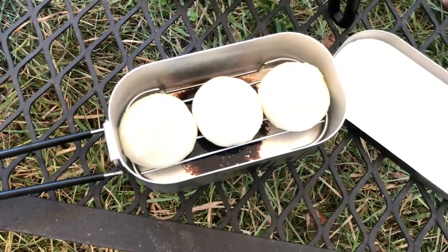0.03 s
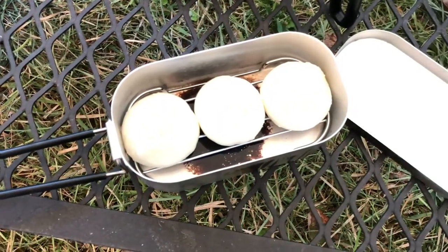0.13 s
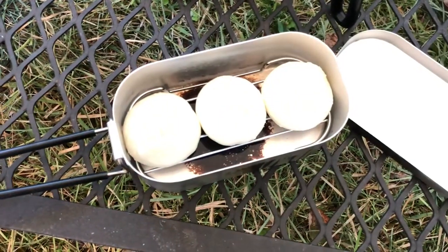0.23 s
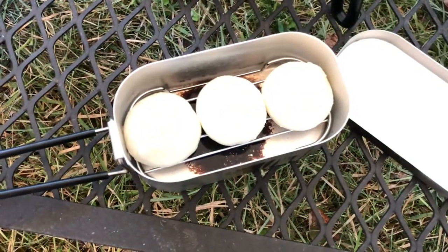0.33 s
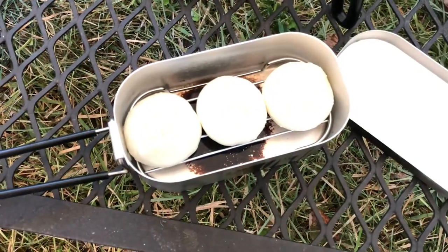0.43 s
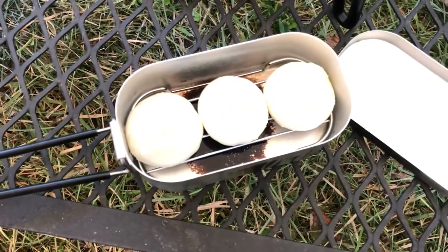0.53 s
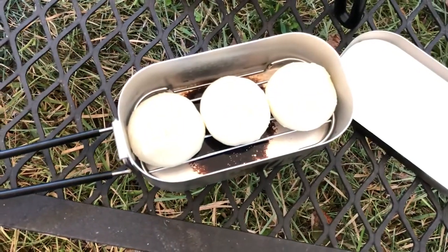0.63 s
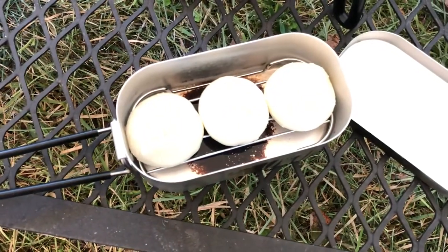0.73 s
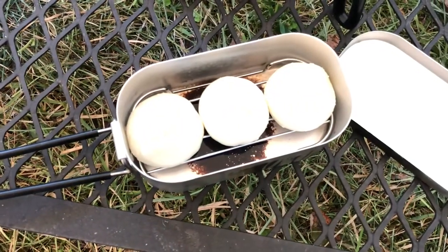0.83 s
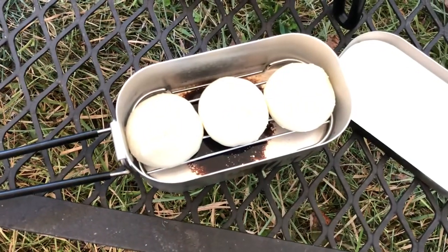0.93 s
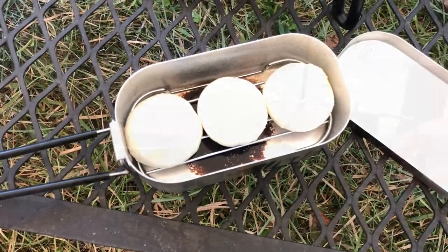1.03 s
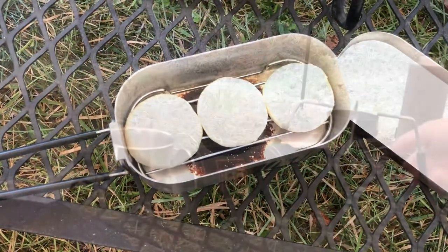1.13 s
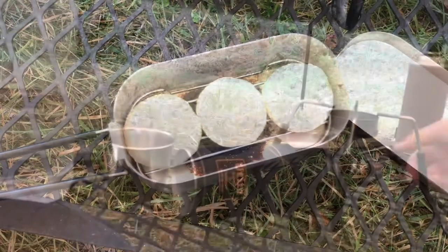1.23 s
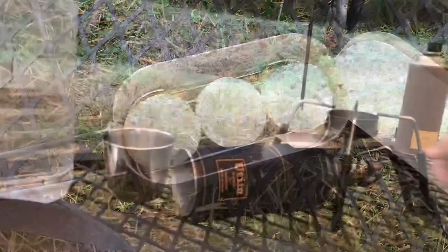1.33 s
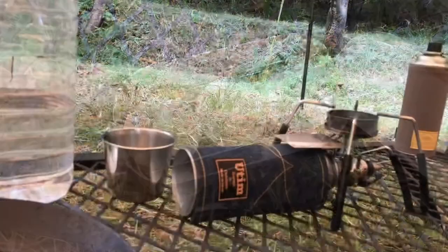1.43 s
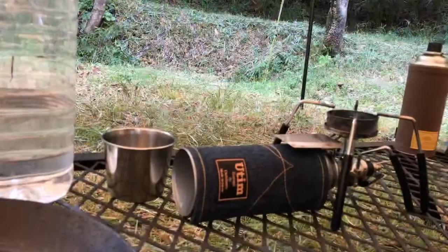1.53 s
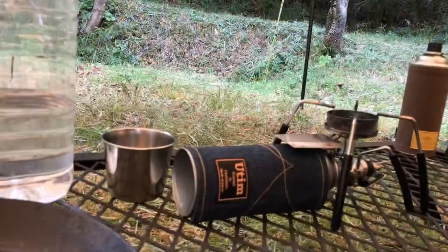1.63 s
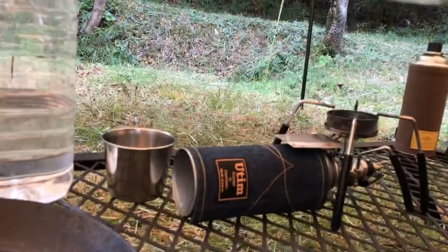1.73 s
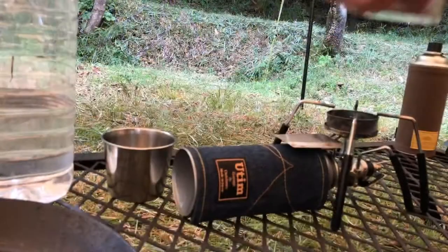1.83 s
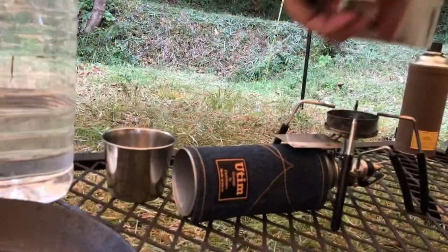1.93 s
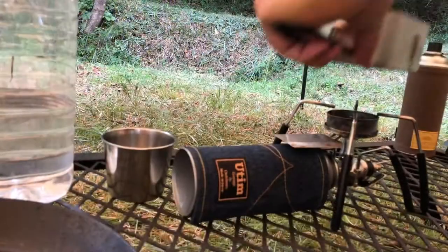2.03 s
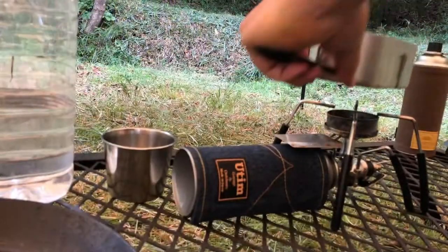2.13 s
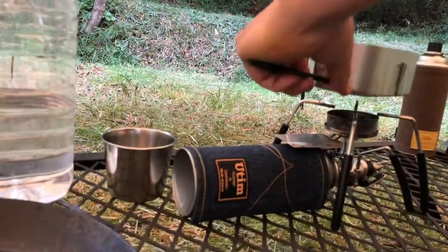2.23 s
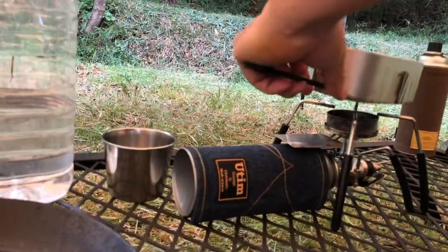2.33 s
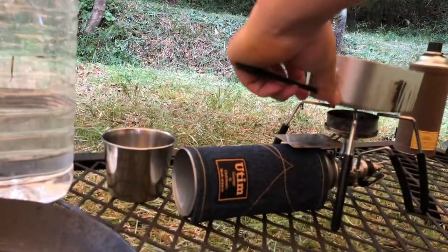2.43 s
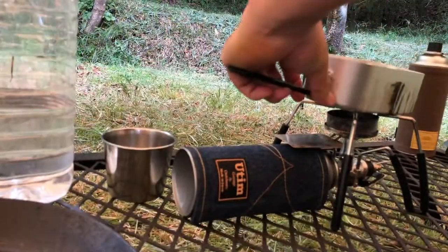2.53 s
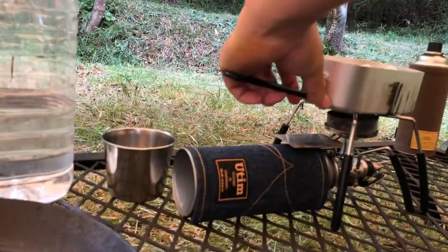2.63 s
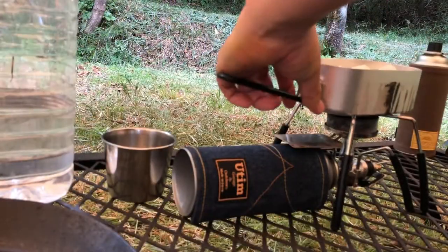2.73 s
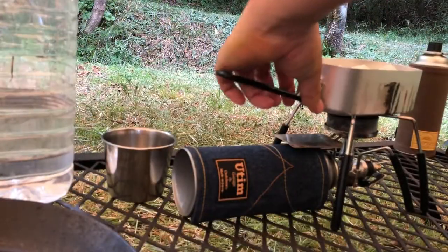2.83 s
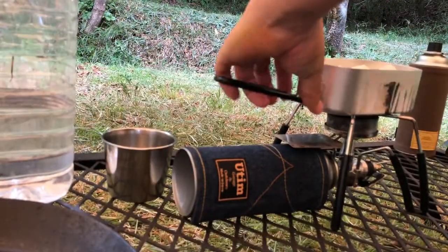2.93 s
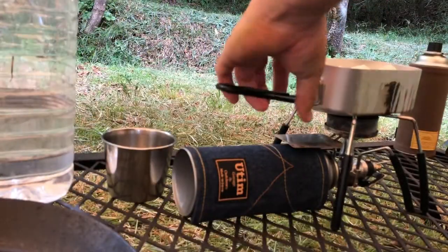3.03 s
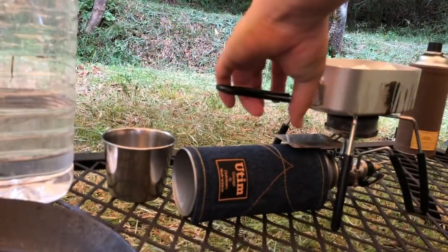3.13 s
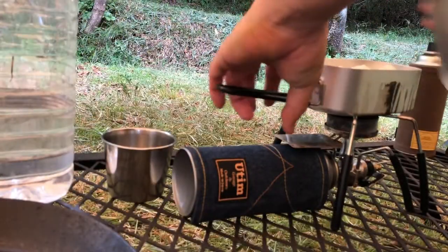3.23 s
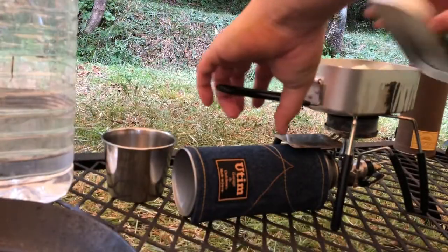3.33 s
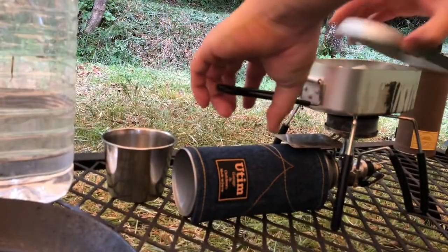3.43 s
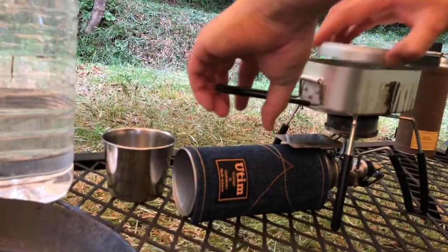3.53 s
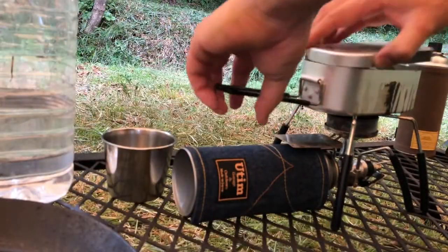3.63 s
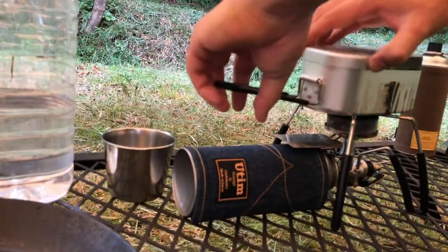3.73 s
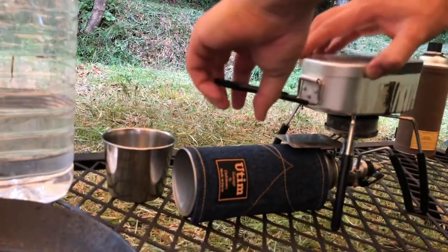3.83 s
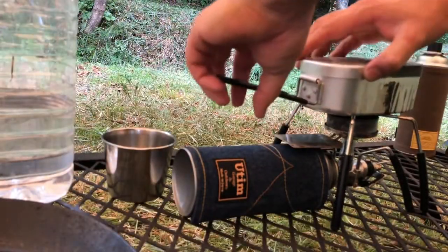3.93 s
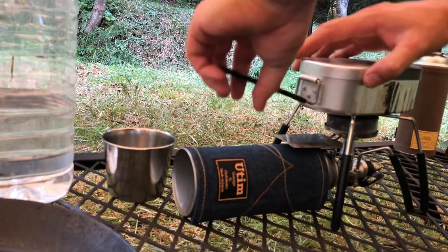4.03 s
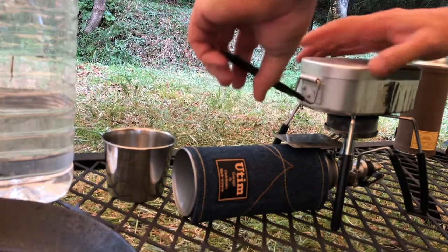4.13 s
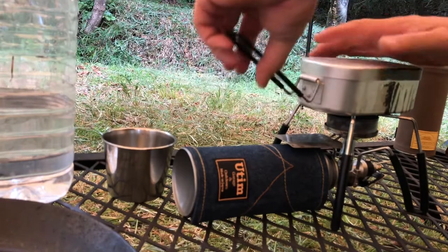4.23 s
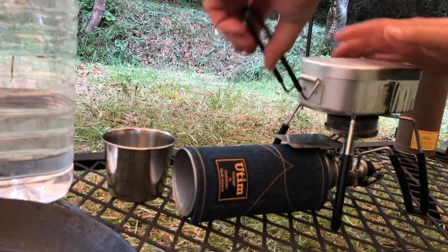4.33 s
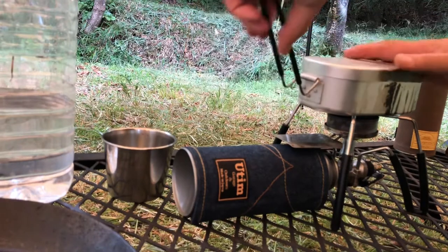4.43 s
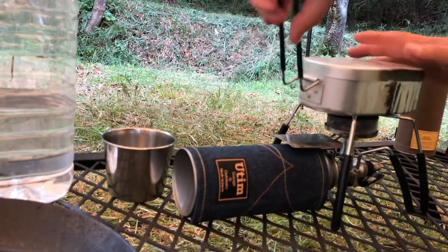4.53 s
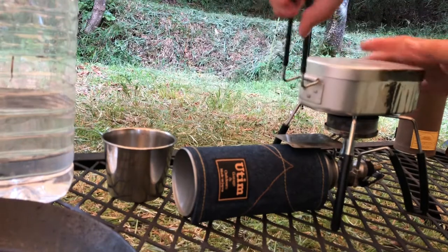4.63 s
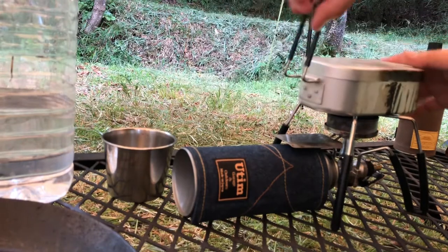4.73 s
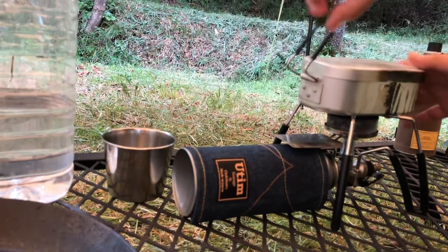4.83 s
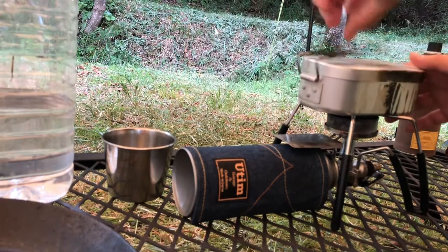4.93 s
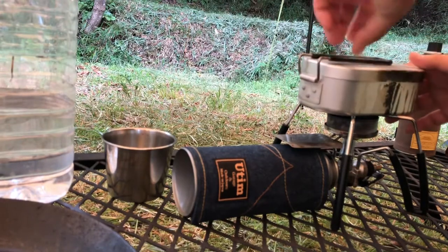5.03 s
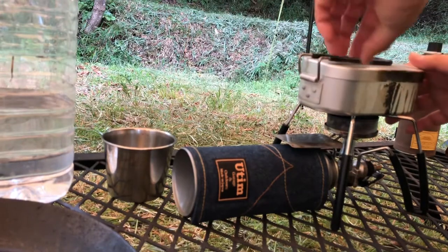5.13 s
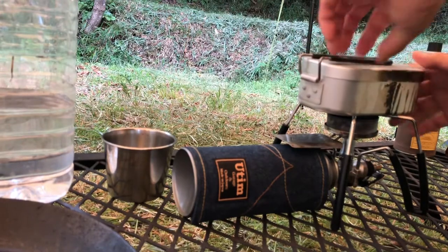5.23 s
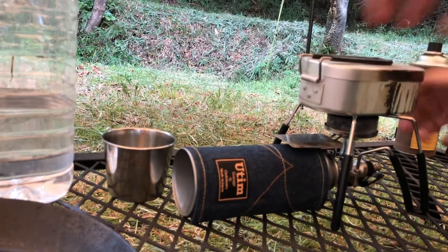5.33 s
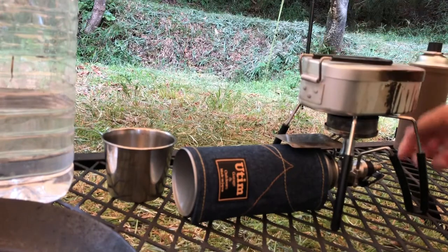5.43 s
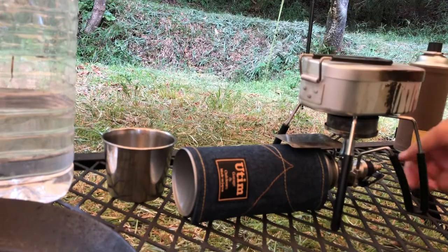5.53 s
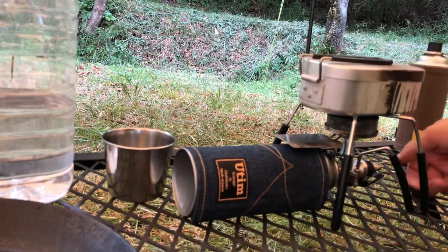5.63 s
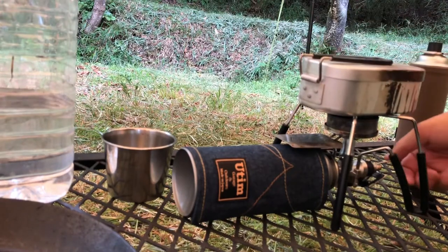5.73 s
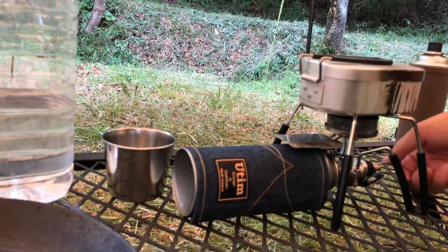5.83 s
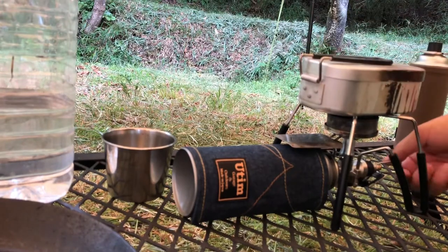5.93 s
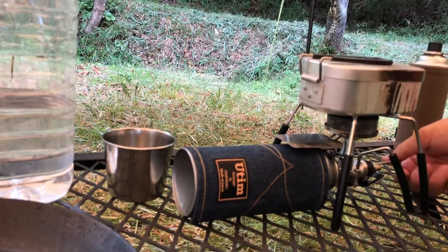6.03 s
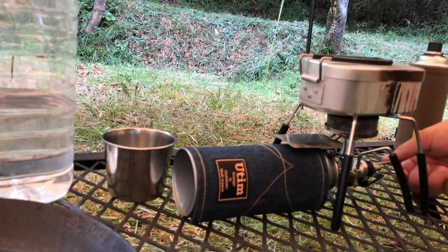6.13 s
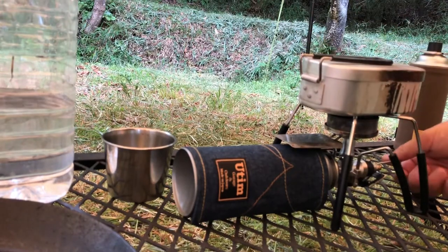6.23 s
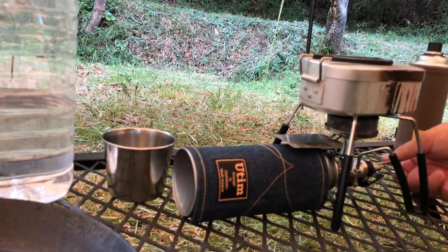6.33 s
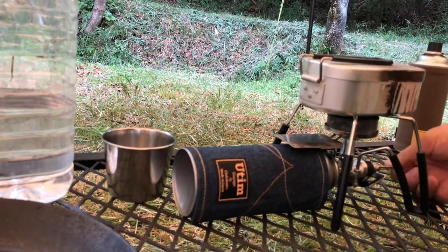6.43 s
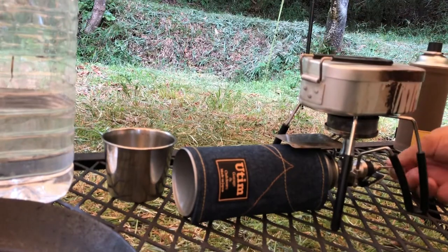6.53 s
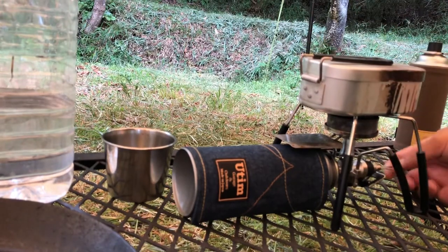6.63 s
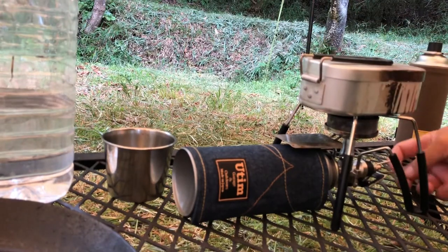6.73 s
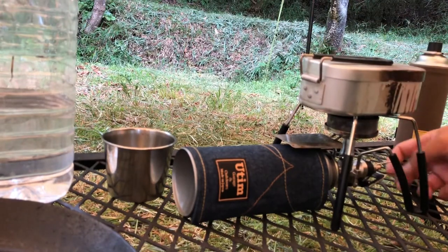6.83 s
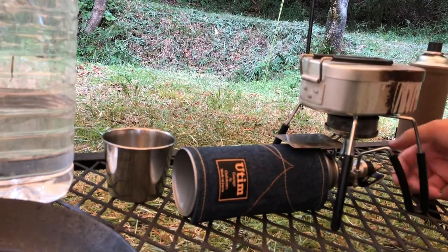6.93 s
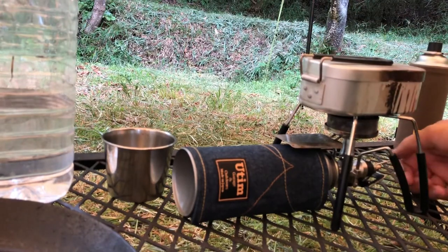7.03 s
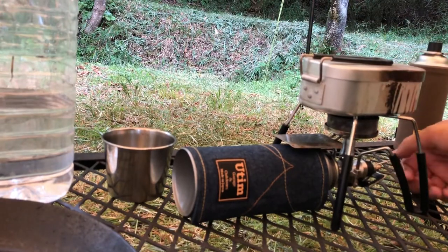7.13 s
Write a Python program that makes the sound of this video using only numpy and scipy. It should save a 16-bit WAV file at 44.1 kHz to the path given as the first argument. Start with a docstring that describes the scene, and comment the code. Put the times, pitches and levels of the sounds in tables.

```python
"""Setting up a camp stove

Outdoors, with insects singing far off, feet shift on dry grass: breaking blades, snapping stalks and soft thuds.
An aluminium mess tin is set on a camp stove and slid into place, its lid is pressed on and its wire handle
is folded over until it slaps the lid. Knocks ring groups of modes; friction is a stream of tiny slips.
A hand brushes the stove's leg with a puff and a hiss of shaped noise, then turns the gas valve, which clicks,
squeaks and rushes faintly at each twist. Knocks and rubbing also stir the steel mesh table below."""
import sys
import numpy as np
from scipy import signal
from scipy.fft import rfft, irfft
from scipy.io import wavfile

SR = 44100
rng = np.random.default_rng(int(sys.argv[2]) if len(sys.argv) > 2 else 0)


def store_wav(level_fs):
    """Save 16-bit WAV to argv[1]."""
    pcm = np.round(np.clip(np.atleast_2d(level_fs), -1, 1) * 32767)
    wavfile.write(sys.argv[1], SR, pcm.T.astype(np.int16))


N = 317520
TIME = np.arange(N) / SR
RING_TIME = TIME[:SR // 2]   # half a second for each ringing sound

# half-octave bands: (centre f/Hz, filter)
EDGES = 44 * 2 ** (np.arange(18) / 2)
BANDS = [(np.sqrt(lo * hi), signal.butter(2, [lo, hi], "band", fs=SR, output="sos"))
         for lo, hi in zip(EDGES, EDGES[1:])]

# the crowd of weak modes in the tin, also the colour of its rasp: f/Hz, level/dB per Hz
TIN_WASH = [(80, -32.5), (200, -8), (600, 5.5), (850, 2.5), (1400, 0.5), (2100, -1), (3300, -3), (7000, -7),
            (10000, -8.5), (16000, -8.5)]
# feet come down on dry grass: t/s, crunch level/dB, time to full weight/s, time on the ground/s
STEPS = [(.05, -36.5, 0.098, .46), (.51, -35.5, 0.079, 0.397)]


def from_db(db):
    """Turn decibels into gain."""
    return 10 ** (np.asarray(db) / 20)


def rms_one(x):
    """Scale to an average strength (rms) of 1."""
    return x / np.sqrt(np.mean(x ** 2) + 1e-20)


def attack_one(x):
    """Scale a blow so that its first hundredth of a second has rms 1."""
    return x / np.sqrt(np.mean(x[:SR // 100] ** 2) + 1e-20)


def level(rows):
    """Read a dB curve as gain over time."""
    return from_db(np.interp(TIME, *np.transpose(rows)))


def at_hz(points, hz):
    """Read a table between its points on a log-frequency axis."""
    points = np.array(points)
    return np.interp(np.log(hz + 1e-9), np.log(points[:, 0]), points[:, 1])


def coloured(x, spectrum):
    """Give a sound more or less of each frequency, as the spectrum says; rms 1."""
    gain = from_db(at_hz(spectrum, np.fft.rfftfreq(N, 1 / SR)))
    return rms_one(irfft(rfft(x) * gain, N))


def drift(rate_hz):
    """Wander slowly at random, with rms 1: noise smoothed by a two-pole filter."""
    step = 40   # only every 40th sample is drawn, the rest lie on straight lines between
    r = np.exp(-2 * np.pi * rate_hz * step / SR)
    noise = rng.standard_normal(N // step + 2002)
    slow = signal.lfilter([1], [1, -2 * r, r * r], noise)[2000:]
    return np.interp(np.arange(N) / step, np.arange(len(slow)), rms_one(slow))


def add(out, s, sound):
    """Mix a sound in at time s."""
    i = max(0, round(s * SR))
    out[i:i + len(sound)] += sound[:N - i]


def grains(per_s, spread_db):
    """Scatter tiny clicks of uneven size and random sign; rms 1."""
    sizes = from_db(spread_db * np.minimum(rng.exponential(1, N), 4))
    happens = rng.random(N) < per_s / SR
    return rms_one(sizes * rng.choice([-1, 1], N) * happens)


def ring(modes, uneven_db=1.5, detune=0):
    """Ring a set of fading sines, signs alternating, strengths a little different each time."""
    hz, db, t60 = np.array(modes).T[:, :, None]
    strength = from_db(db + uneven_db * rng.standard_normal(hz.shape))
    strength[1::2] *= -1
    hz = hz * (1 + detune * rng.standard_normal(hz.shape))
    fade = np.exp(-np.log(1000) * RING_TIME / t60)
    return attack_one(np.sum(strength * fade * np.sin(2 * np.pi * hz * RING_TIME), axis=0))


def wash(spectrum, decay):
    """Stand in for modes too dense to tell apart: noise that dies band by band."""
    white, out = rng.standard_normal((2, len(RING_TIME))), 0
    for k, (hz, band) in enumerate(BANDS):
        fade = np.exp(-np.log(1000) * RING_TIME / at_hz(decay, hz))
        strength = np.sqrt(hz * np.mean(fade ** 2))   # wider bands hold more
        noise = rms_one(signal.sosfilt(band, white[k % 2] * fade))
        out = out + from_db(at_hz(spectrum, hz)) * strength * noise
    return attack_one(out)


def crack(t60=0.027):
    """Make the bright instant of contact: a short burst of noise with its bass thinned."""
    burst = rng.standard_normal(len(RING_TIME)) * np.exp(-np.log(1000) * RING_TIME / t60)
    return attack_one(signal.sosfilt(signal.butter(1, 1500, "high", fs=SR, output="sos"), burst))


def metal(ringing, spectrum, wash_db, crack_db):
    """Build a struck metal part: contact crack, strong modes and the crowd between them."""
    # how fast the crowd dies: f/Hz, t60/s
    wash_t60 = [(150, 0.042), (1000, 0.037), (4000, 0.065), (16000, 0.066)]
    return from_db(crack_db) * crack() + ringing + from_db(wash_db) * wash(spectrum, wash_t60)


def blows(rows, body, bass_hz=450, treble_hz=5000):
    """Strike a body: a heavy contact adds bass, a hard one treble."""
    out = np.zeros(N)
    low, high = signal.butter(1, bass_hz, fs=SR), signal.butter(1, treble_hz, "high", fs=SR)
    for s, db, bass_db, treble_db in rows:
        sound = body()
        sound = sound + (from_db(bass_db) - 1) * signal.lfilter(*low, sound)
        sound = sound + (from_db(treble_db) - 1) * signal.lfilter(*high, sound)
        add(out, s, from_db(db) * attack_one(sound))
    return out


def rubbed(response, per_s, spread_db):
    """Rub a part: a stream of tiny slips keeps it ringing; rms 1."""
    return rms_one(signal.fftconvolve(grains(per_s, spread_db), response)[:N])


def strokes(rows):
    """Shape the gain of hand strokes: each swells to a rounded peak and fades again."""
    depth_db = 15   # swell within the rise time, and fade within the fall time
    db = []
    for s, peak_db, rise, fall in rows:
        drop = np.where(TIME < s, ((s - TIME) / rise) ** 2, (TIME - s) / fall)
        db.append(peak_db - depth_db * drop)
    return from_db(np.maximum(np.max(db, axis=0), -200))


def open_air():
    """Still air outdoors: coloured noise, a thin hiss over a low rumble of uneven strength."""
    # colour of the air: f/Hz, level/dB per Hz
    air_colour = [(15, -37.5), (30, -25.5), (50, -5), (90, -2), (150, -3.5), (300, -12), (600, -16.5),
                  (1400, -21), (3000, -24), (8000, -28.5), (15500, -29.5)]
    air = coloured(rng.standard_normal(N), air_colour)
    rumble = signal.sosfiltfilt(signal.butter(2, 250, fs=SR, output="sos"), air)
    lumps = from_db(3.2 * drift(12))
    return from_db(-63) * (air + rumble * (lumps - 1))


def far_insects():
    """Two wavering noise bands: insects that sink slowly over the first second, then soon rise again."""
    # choruses: f/Hz, width/Hz, level before the shared level curve/dB
    choruses = [(4330, 880, -69), (6500, 1200, -71)]
    # shared level curve: t/s, level/dB
    swell = [(0, 2.5), (1.1, -3), (1.5, 2), (7.3, 1)]
    out = np.zeros(N)
    for hz, width, db in choruses:
        band = signal.butter(2, [hz - width / 2, hz + width / 2], "band", fs=SR, output="sos")
        waver = from_db(.6 * drift(6))
        chorus = rms_one(signal.sosfilt(band, rng.standard_normal(N)))
        out += level(swell) * waver * from_db(db) * chorus
    return out


def tread(t):
    """Crunch in dB at times t: it grows as a foot takes the weight, settles, and stops when the foot lifts."""
    touch_db, standing_db = -11.5, -11.5   # at first touch and at rest, relative to the peak
    settle_db_per_s, lift_db_per_s = 81, 446   # fall after full weight; fade as the foot lifts
    db = np.full(len(t), -200.)
    for s, peak_db, load_s, ground_s in STEPS:
        age = t - s
        loading_db = touch_db * (1 - age / load_s)
        settling_db = np.maximum(-settle_db_per_s * (age - load_s), standing_db)
        weight_db = np.where(age < load_s, loading_db, settling_db)
        lift_db = -lift_db_per_s * np.maximum(age - ground_s, 0)
        db = np.where(age < 0, db, np.maximum(db, peak_db + weight_db + lift_db))
    return db


def crackle():
    """Breaking blades: each rings briefly in a band of its own; a few cracks span all pitches."""
    pitched = sum(signal.sosfilt(band, grains(600, 4.2)) for hz, band in BANDS)
    return rms_one(pitched) + from_db(-6) * grains(1200, 3.5)


def grass_crunch():
    """Dry grass under the sole: crackle that follows the weight and breaks in clumps, with lulls between."""
    # f/Hz, level/dB per Hz
    crunch_colour = [(59, -26), (100, -1), (249, 3), (558, -5), (721, 1), (930, -3.5), (2080, -2),
                     (2860, -12), (3470, -6.5), (9820, -22.5), (16000, -27)]
    clumps_db = 2.5 * drift(42)
    return from_db(tread(TIME) + clumps_db) * coloured(crackle(), crunch_colour)


def thin_snaps():
    """Thin stalks break at random while a sole presses: rows of (t/s, level/dB, bass/dB, treble/dB)."""
    start, end = STEPS[0][0], STEPS[-1][0] + STEPS[-1][3]
    times = start + np.cumsum(rng.gamma(2, .5, size=80)) / 40   # 40 snaps per second on average
    levels = tread(times) + rng.standard_normal(size=80)   # at the crunch level, spread by 1 dB
    return [(s, db, 0, -3) for s, db in zip(times, levels) if s < end]


def stalk_snaps():
    """Single stalks snap: very short bursts of noise, each with a colour of its own."""
    # thick stalks: t/s, level/dB, bass/dB, treble/dB
    thick_snaps = [(.052, -39, 19, -8), (.081, -42, 6, 10), (.1058, -36.5, 21, 11), (.2604, -39.5, -13, 30),
                   (.3392, -44.5, 16, -14), (.4265, -42.5, 12, 5), (.6326, -38.5, 4, 15), (.714, -38, 1, 8),
                   (.7368, -39.5, -11, 22), (.8206, -49, -16, -17), (.8585, -31.5, -24, -3.5),
                   (.9508, -49.5, -11, -25), (1.0292, -53, -21, -24), (1.044, -50.5, -13, -26),
                   (1.0651, -50.5, 10, -22), (1.1808, -55, -14, 1)]
    # average colour of a snap: f/Hz, level/dB per Hz
    snap_wash = [(100, 3.5), (600, -6), (1700, 0.5), (4000, -6), (8000, -14.5), (16000, -25)]
    snap_t60 = [(300, .01275), (10000, .0275)]   # f/Hz, t60/s

    def stalk():
        """Vary the colour of one stalk at random, band by band."""
        colour = [(hz, at_hz(snap_wash, hz) + 3.5 * rng.standard_normal()) for hz, band in BANDS]
        return wash(colour, snap_t60)

    return blows(thick_snaps + thin_snaps(), stalk)


def foot_thuds():
    """The weight of the foot thuds on the ground: low sines that die at once."""
    # t/s, level/dB, f/Hz
    thuds = [(0.054, -23.5, 126), (0.074, -26, 70), (0.147, -25, 120), (0.304, -28, 213)]
    t60_s = 0.023
    fade = np.exp(-np.log(1000) * RING_TIME / t60_s)
    out = np.zeros(N)
    for s, db, hz in thuds:
        add(out, s, from_db(db) * np.sin(2 * np.pi * hz * RING_TIME) * fade)
    return out


def table(shaking):
    """The steel mesh table rings on faintly after whatever shakes it, mostly as a diffuse rattle."""
    # clear modes: f/Hz, level/dB, t60/s
    table_modes = [(501, -11, .3), (680, -5, .25), (1033, -1, 0.43), (1152, -2, .22), (1750, -13.5, 0.15),
                   (2544, -4, 0.58)]
    # colour of the diffuse ring: f/Hz, level/dB per Hz
    table_wash = [(80, 5.5), (250, -0.5), (550, -11), (1150, 1), (1600, -7.5), (4000, -14.5), (8000, -3),
                  (16000, -30)]
    # how fast the diffuse ring dies: f/Hz, t60/s
    table_t60 = [(100, 1), (1000, 0.45), (4000, 0.1), (16000, 0.23)]
    response = from_db(-11) * ring(table_modes) + wash(table_wash, table_t60)
    response = response / np.sqrt(np.sum(response ** 2))
    return signal.fftconvolve(shaking, response)[:N]


def leg_brush():
    """A hand brushes the stove's leg: a dull puff of clicks, then a slightly hollow hiss of noise."""
    # strokes of the puff: peak t/s, level/dB, rise/s, fall/s
    puff_strokes = [(5.603, -45.5, 0.026, 0.029)]
    # strokes of the hiss: peak t/s, level/dB, rise/s, fall/s
    hiss_strokes = [(5.635, -53.5, 0.064, 0.15)]
    # f/Hz, level/dB per Hz
    puff_colour = [(150, -12), (380, 8), (850, 5.5), (1300, -13), (3000, -18)]
    # f/Hz, level/dB per Hz
    hiss_colour = [(240, -32.5), (400, -2), (1010, -4), (1710, 2), (1960, -5), (3370, -7.5), (3750, -8),
                   (4440, -8.5), (11600, -16), (16000, -18)]
    # modes of the brushed leg: f/Hz, level/dB, t60/s
    leg_modes = [(1624, 1, .04), (3320, 3, 0.095)]
    puff = strokes(puff_strokes) * coloured(grains(1500, 1.9), puff_colour)
    hiss = coloured(rng.standard_normal(N), hiss_colour)
    hollow = from_db(-8.5) * rubbed(ring(leg_modes), 4000, 2.0)
    return puff + strokes(hiss_strokes) * (hiss + hollow)


def valve():
    """Each twist of the stiff valve brings a faint rough rush that fades with it, and a squeak that rings on."""
    # twists: peak t/s, level/dB, rise/s, fall/s
    turns = [(6.39, -46.5, 0.012, 0.12), (6.75, -65.5, 0.064, 0.21), (6.92, -57.5, .06, 0.095)]
    # colour of the rough rush: f/Hz, level/dB per Hz
    rush_colour = [(150, -21), (400, -8), (680, -1.5), (850, -7.5), (1100, 1.5), (1500, -15.5),
                   (3000, -15.5), (6000, -14.5), (8500, -18), (11000, -29), (16000, -31)]
    # squeaking modes: f/Hz, level/dB, t60/s
    squeak_modes = [(1046, 0, 0.14), (1750, -1, 0.6), (2530, -3.5, 0.55), (3050, -4, 0.21),
                    (8400, 3, 0.017)]
    twist = strokes(turns)
    rough_rush = twist * coloured(grains(6000, 6.0), rush_colour)
    stem = ring(squeak_modes)
    stem = stem / np.sqrt(np.sum(stem ** 2))
    squeak = signal.fftconvolve(twist * grains(3500, 0.88), stem)[:N]
    return rough_rush + from_db(-7) * squeak


def frame_judder():
    """The hand jogs the stove's frame, whose low modes are kept ringing by a stream of slips."""
    # t/s, level/dB
    jogs = [(6.42, -52), (6.58, -54.5), (6.84, -61), (7.04, -60)]
    # f/Hz, level/dB, t60/s
    frame_modes = [(123, -3, 0.4), (185, 1.5, 0.07), (276, -5, .1)]
    rise_s, fall_s = 0.064, 0.088
    push = strokes([(s, db, rise_s, fall_s) for s, db in jogs])
    return push * rubbed(ring(frame_modes), 220, 1.4)


def rasp():
    """Gritty rubbing of the tin: tiny slips in the tin's colour."""
    return coloured(grains(3700, 2.5), TIN_WASH)


def handle_creak():
    """The carried tin creaks on its handle: slips ring a few modes, with some rasp."""
    # peak t/s, level/dB, rise/s, fall/s
    creaks = [(1.99, -56, 0.021, .1), (2.045, -50, 0.023, .04), (2.10, -54, 0.034, 0.037)]
    # f/Hz, level/dB, t60/s
    creak_modes = [(925, -2, 0.036), (1120, -6, 0.026), (3870, 2, 0.027), (4800, 5, 0.039),
                   (5160, -2, 0.042), (5810, 4, 0.12), (8600, -10, 0.029)]
    return strokes(creaks) * (rubbed(ring(creak_modes), 880, 5.1) + from_db(-7.5) * rasp())


def tin_slide():
    """The tin slides on the stove's arms, catching and slipping: uneven grit plus the singing arms."""
    # pushes: peak t/s, level/dB, rise/s, fall/s
    slides = [(2.68, -46.5, 0.047, 0.23), (2.83, -40, 0.069, 0.091), (3.025, -41.5, .012, 0.05)]
    # colour of the grit: f/Hz, level/dB per Hz
    slide_colour = [(200, -20.5), (450, -8), (680, 0.5), (880, -4), (1150, 2.5), (1500, -11.5),
                    (2500, -5.5), (3200, -4.5), (4100, -4), (6000, -13.5), (9000, -14), (16000, -25)]
    # what the tin makes sing in the arms: f/Hz, level/dB, t60/s
    arm_modes = [(664, -28, 0.09), (1020, -17, 0.25), (2090, 7, 0.066), (2580, 5, 0.18), (3030, -7, .05),
                 (3460, -8, 0.073), (3970, 7, 0.13), (6060, -3, 0.11)]
    steel_t60_s = 0.15
    # noise stands in for many close modes of the steel
    steel = rng.standard_normal(len(RING_TIME)) * np.exp(-np.log(1000) * RING_TIME / steel_t60_s)
    grit = coloured(rubbed(steel, 2500, 5.1), slide_colour)
    catching = from_db(1.5 * drift(78))
    singing = rubbed(ring(arm_modes), 2500, 1.6)
    return strokes(slides) * (from_db(-2.5) * grit * catching + from_db(-7.5) * singing)


def lid_rub():
    """The lid rubs down over the rim: a rasp, and a squeak whose share changes from rub to rub."""
    # peak t/s, level/dB, rise/s, fall/s, squeak against that level/dB
    rubs = [(3.636, -55.5, 0.098, 0.063, 1), (3.754, -38.5, 0.02, 0.073, -13),
            (3.97, -54, 0.083, 0.06, -26)]
    # squeaking modes: f/Hz, level/dB, t60/s
    squeak_modes = [(758, 4, 0.052), (930, 4, 0.069), (2740, 14, 0.029), (2810, 10, 0.091)]
    pressure = strokes([(s, db, rise, fall) for s, db, rise, fall, _ in rubs])
    squeaking = strokes([(s, db + squeak_db, rise, fall) for s, db, rise, fall, squeak_db in rubs])
    return from_db(-2.5) * pressure * rasp() + squeaking * rubbed(ring(squeak_modes), 2300, 4.3)


def stove_knocks():
    """Blows on the stove's steel arms and valve ring the steel modes."""
    # t/s, level/dB, bass/dB, treble/dB
    knocks = [(2.4272, -26, 3, 8.5), (2.4395, -31, 5, 37), (3.020, -47.5, 30, -16), (3.044, -49.5, 32, -13),
              (6.379, -40.5, 7.5, 18)]
    # f/Hz, level/dB, t60/s
    stove_modes = [(670, -17, .12), (813, -15, .11), (1110, -9, .11), (1750, 2, .095), (2067, -6, .075),
                   (2290, -5, .055), (2890, -1, .07), (3110, -1, .07), (3763, -9, .085), (4140, -8, .06),
                   (4570, -7, .06), (5706, -18, .06)]
    # the crowd of weaker modes: f/Hz, level/dB per Hz
    stove_wash = [(80, -16), (250, -7.5), (600, -2), (1100, -6), (2800, 3.5), (4500, -9.5), (7000, -16.5),
                  (16000, -24)]
    return blows(knocks, lambda: metal(ring(stove_modes), stove_wash, wash_db=-3, crack_db=-14))


def wire():
    """The handle touches at a new point each time, so its modes shift; its high treble dies fast."""
    # f/Hz, level/dB, t60/s
    handle_modes = [(1330, -10, .04), (1680, -1, .04), (1780, -2, .045), (2080, -4, .04), (2860, -6, .04),
                    (3120, -3, .045), (4110, -7, .045)]
    # the crowd of weaker modes: f/Hz, level/dB per Hz
    handle_wash = [(80, -30), (600, -4.5), (1000, -2), (2000, -12.5), (4500, -14), (16000, -7)]
    ringing = ring(handle_modes, uneven_db=2.5, detune=.028)
    crowd = wash(handle_wash, [(500, 0.039), (3000, 0.11), (10000, 0.019)])   # f/Hz, t60/s
    return ringing + from_db(-1.5) * crowd + from_db(-18) * crack(t60=.008)


def handle_ticks():
    """The wire handle ticks in its hinge; each tick strikes the wire afresh."""
    # t/s, level/dB, treble/dB
    ticks = [(1.913, -58, -5), (2.228, -59, -3), (2.685, -38, -8), (2.754, -45.5, -28), (2.9386, -35, -13),
             (2.9715, -41, 7), (4.315, -58, 23), (4.4762, -39.5, -25), (4.653, -47.5, 5.5),
             (4.7154, -53.5, -4), (4.7532, -51.5, -6), (4.846, -56.5, -9), (5.0842, -52.5, -12),
             (5.2027, -48, -32), (5.2397, -51, -31)]
    bass_db = -8   # the light wire has little bass
    return blows([(s, db, bass_db, treble_db) for s, db, treble_db in ticks], wire, treble_hz=3500)


def bracket_snaps():
    """The raised handle snaps past its bracket, which rings with modes of its own."""
    # t/s, level/dB, bass/dB, treble/dB
    snaps = [(4.3612, -32.5, -7, 4), (4.373, -27, 2.5, -7.5)]
    # f/Hz, level/dB, t60/s
    bracket_modes = [(175, -2, .06), (248, 1, .06), (510, -2, .06), (596, -2, .07), (757, -2, .07),
                     (1030, -4, .08), (2881, -3, .085), (3617, -5, .08), (3907, -2, .07)]
    return blows(snaps, lambda: metal(ring(bracket_modes), TIN_WASH, wash_db=0, crack_db=2))


def tin_knocks():
    """Blows on the aluminium tin and its lid ring the tin's modes."""
    # t/s, level/dB, bass/dB, treble/dB
    knocks = [(3.733, -41.5, 7, -19), (3.838, -32, 7, 1.5), (3.856, -43, -24, -14), (3.955, -45.5, 26, -18),
              (3.982, -45, 14, -21), (4.058, -51, 11, -18), (4.730, -46, 22, -2), (4.9402, -11.5, 3.5, 3),
              (5.0117, -24, 9, 2)]
    # f/Hz, level/dB, t60/s
    tin_modes = [(205, -8, .05), (300, -7, .05), (428, -9, .06), (520, 2, .045), (612, 4, .055),
                 (985, -14, .09), (1875, -9, .07), (2056, -4, .062), (2194, 1, .068), (2885, -3, .055),
                 (3121, -7, .045), (4070, -8, .058), (5145, -8, .078), (6315, -7, .045), (7564, -8, .035),
                 (9600, -4, .05), (10375, -6, .045), (10688, -5, .052), (12460, -10, .048)]
    return blows(knocks, lambda: metal(ring(tin_modes), TIN_WASH, wash_db=-1, crack_db=-7))


def scene():
    """Put the cookware on its table, in the open air."""
    background = open_air() + far_insects()
    footsteps = grass_crunch() + stalk_snaps() + foot_thuds()
    hand_on_stove = leg_brush() + valve() + frame_judder()
    friction = handle_creak() + tin_slide() + lid_rub()
    stove = stove_knocks()
    tin = handle_ticks() + bracket_snaps() + tin_knocks()
    # small parts radiate little bass
    knocks = signal.sosfilt(signal.butter(4, 135, "high", fs=SR, output="sos"), tin + stove)
    # the stove shakes the table more than the tin does, which is too light to stir its low ring
    light = signal.sosfilt(signal.butter(2, 420, "high", fs=SR, output="sos"), tin)
    shaking = from_db(-18.5) * light + from_db(-7.5) * stove + from_db(-12) * friction
    return (background + footsteps + table(shaking) + hand_on_stove + friction + knocks)[None]


def record(dry):
    """Roll off the deepest bass, clip the highest peaks and cut the top steeply."""
    dry = signal.sosfilt(signal.butter(3, 36, "high", fs=SR, output="sos"), dry)
    dry = np.clip(dry, -.72, .72)
    return signal.sosfilt(signal.ellip(12, .1, 80, 15900, fs=SR, output="sos"), dry)


dry = scene()
out = record(dry)
store_wav(out)
```